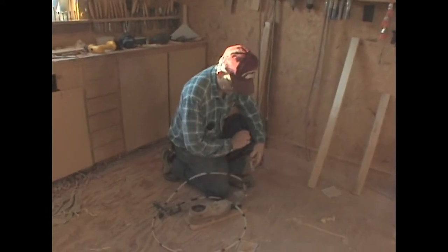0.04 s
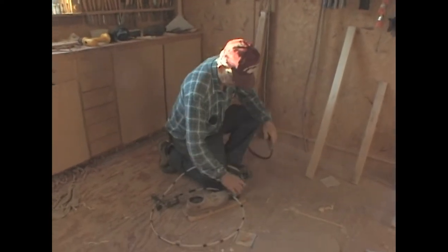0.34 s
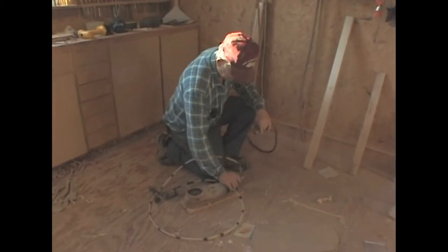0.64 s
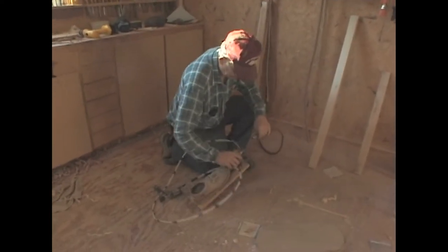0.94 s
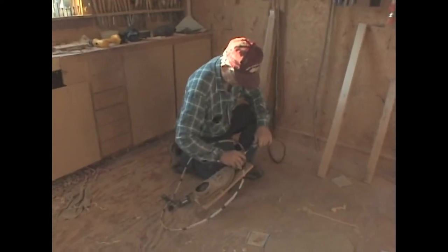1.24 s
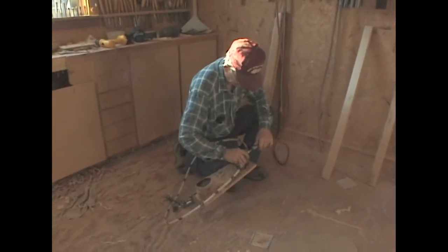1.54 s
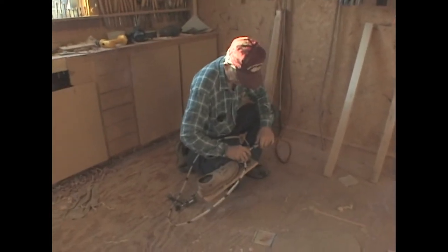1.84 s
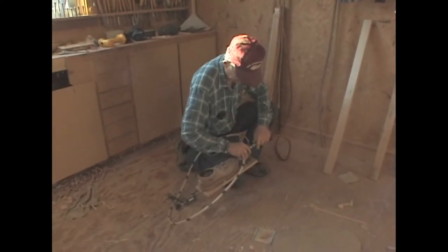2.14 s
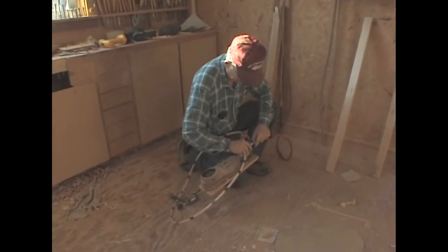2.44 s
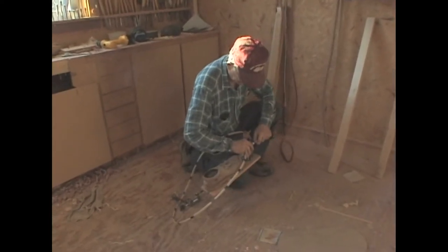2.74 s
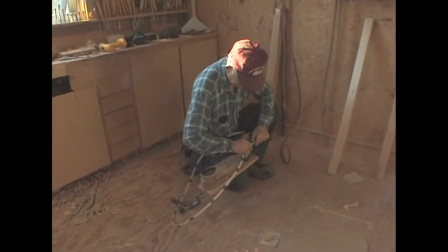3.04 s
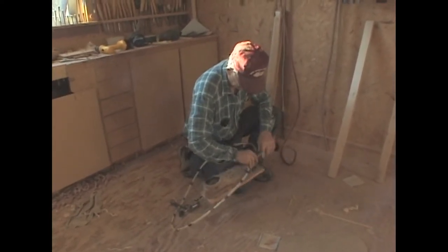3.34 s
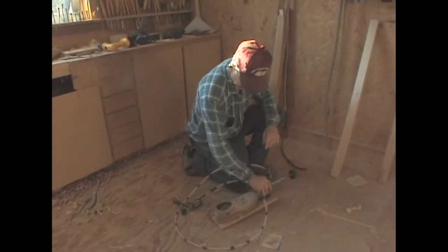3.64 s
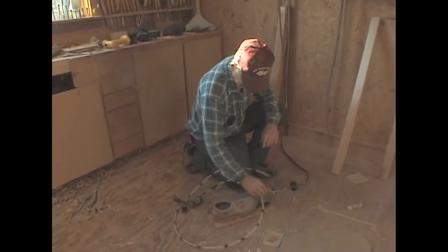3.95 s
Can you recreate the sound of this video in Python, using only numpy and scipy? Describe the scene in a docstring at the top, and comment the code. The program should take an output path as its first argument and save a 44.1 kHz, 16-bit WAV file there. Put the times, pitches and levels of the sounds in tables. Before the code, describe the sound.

An air hose is uncoupled from a tool in a quiet, slightly reverberant wooden workshop. A soft bump, faint rustling and taps fill the first second. The fitting clicks several times from 1.6 to 2.1 seconds, releases one short puff of air at 2.8 and snaps shut at 3.1. The hose end knocks on the floorboards at 3.7, and the tool lands at 3.9 with a dull thump and clink.

```python
"""In a wooden workshop, an air hose is uncoupled from a tool. After some handling on the floor the
fitting clicks as it is worked, lets out one short puff, a turbulent jet, and snaps shut. The hose end
drops on the boards and the tool is set down with a thump and a clink. Each impact is a burst of contact
noise, often with the damped modes of the struck body; the room reverberates after each sound."""
import sys
import numpy as np
from scipy import signal
from scipy.fft import rfft, irfft
from scipy.io import wavfile
from scipy.ndimage import uniform_filter1d

SR = 44100
rng = np.random.default_rng(int(sys.argv[2]) if len(sys.argv) > 2 else 0)


def to_wav(sig):
    """Store sig (one row per channel, or 1-D mono) as 16-bit WAV at the path in sys.argv[1].

    Samples outside -1..1 are clipped; the rate is SR.
    """
    pcm = np.clip(np.atleast_2d(sig), -1, 1) * 32767
    pcm = np.round(pcm).astype(np.int16)
    wavfile.write(sys.argv[1], SR, pcm.T)  # frames by channels


N = 176400

# spectrum of sliding friction: f/Hz, level/dB
SLIDE_SPECTRUM = [(150, -9), (800, 4), (2400, 3), (3500, -2), (4500, -5), (8000, -17.5)]


def amp(db):
    """Amplitude ratio of a level in decibels."""
    return 10 ** (np.asarray(db) / 20)


def unit(x):
    """Normalisation to an rms of 1."""
    return x / np.sqrt(np.mean(x ** 2) + 1e-20)


def unit_energy(x):
    """Normalisation to the energy of 10 ms at an rms of 1."""
    return x / np.sqrt(np.sum(x ** 2) / (SR * .01) + 1e-20)


def value_at(points, hz):
    """Interpolation of (f/Hz, value) points on a log-frequency axis."""
    f, value = np.transpose(points)
    return np.interp(np.log(hz + 1), np.log(f + 1), value)


def add(mix, start_s, sound):
    """Superposition of a sound on the mix."""
    part = mix[max(round(start_s * SR), 0):][:len(sound)]
    part += sound[:len(part)]


def colour(x, spectrum):
    """Minimum-phase filtering by a curve of (f/Hz, level/dB) points."""
    log_gain = np.log(amp(value_at(spectrum, abs(np.fft.fftfreq(4096, 1 / SR)))))
    response = np.fft.ifft(np.exp(np.conj(signal.hilbert(log_gain)))).real
    return signal.oaconvolve(x, response[:len(response) // 2])[:len(x)]


def brighten(x, lift_db, from_hz=4000, to_hz=13000):
    """A shelving filter lifts or dulls the treble."""
    return colour(x, [(from_hz, 0), (to_hz, lift_db)])


def uneven(x, deviation_db=3.2):
    """Modal coupling: each point of contact favours some treble resonances and misses others."""
    hz = np.geomspace(900, 16000, 48)
    db = np.append(0, deviation_db * rng.standard_normal(len(hz) - 1))
    return colour(x, np.transpose([hz, db]))


def contact(t, fade_s, rise_s):
    """Chatter of two surfaces is broadband noise: it rises, holds as long again, and fades."""
    envelope = np.minimum(t / rise_s, 1) * np.exp(-np.maximum(t - 2 * rise_s, 0) / fade_s)
    chatter = rng.standard_normal(len(t)) * envelope
    for _ in range(3):  # flatten the spectrum, then restore the outline in time
        chatter = irfft(np.exp(1j * np.angle(rfft(chatter))), len(t)) * np.sqrt(envelope)
    return chatter


def mode(t, hz, t60, spread):
    """Seven close partials beat as they decay; the grip detunes them from blow to blow."""
    detune, phase = rng.uniform(-1.134, 1, (2, 7, 1))
    partials = np.sin(2 * np.pi * (hz * (1 + spread * detune) * t + phase))
    return 1000 ** (-t / t60) * partials.sum(0)


def impacts(blows, spectrum, modes=(), rise_s=.001, spread=.017):
    """Impact excitation: contact noise plus any damped modes; hardness favours the upper ones."""
    out, t = np.zeros(N), np.arange(SR // 4) / SR
    swell = 1 - np.exp(-t / rise_s)
    for start, db, fade_s, lift_db, *hardness_db in blows:
        crack = unit_energy(uneven(colour(contact(t, fade_s, rise_s), spectrum)))
        ringing = sum(amp(mode_db) * unit_energy(swell * mode(t, hz, t60, spread))
                      for hz, mode_db, t60 in modes)
        blow = crack + ringing
        if hardness_db:
            blow = brighten(blow, hardness_db[0], from_hz=1200, to_hz=4200)
        add(out, start, amp(db) * unit_energy(brighten(blow, lift_db)))
    return out


def friction(spectrum, grain_db=3):
    """Rubbing surfaces give noise, amplitude-modulated in clumps of about 3 ms."""
    clumps = unit(uniform_filter1d(rng.standard_normal(N), 130))
    return unit(colour(rng.standard_normal(N) * amp(grain_db * clumps), spectrum))


def room_tone(level_db=-64.5):
    """Stationary background noise, strongest in the bass."""
    spectrum = [(25, -8.5), (300, 5), (700, -7), (2000, -13), (15000, -19)]  # f/Hz, level/dB
    return amp(level_db) * unit(colour(rng.standard_normal(N), spectrum))


def clothes_rustle():
    """Friction of cloth gives a faint noise that swells and sinks."""
    envelope = [(.2, -54), (.35, -64), (1, -62), (1.5, -76), (2.7, -76), (3.4, -62.5)]  # t/s, level/dB
    spectrum = [(60, -8.5), (400, 1.5), (2000, -12.5), (14000, -20.5)]  # f/Hz, level/dB
    return friction(spectrum) * amp(np.interp(np.arange(N) / SR, *np.transpose(envelope)))


def floor_bumps():
    """Soft impacts on the floor put little energy into the treble."""
    blows = [(.1085, -30.5, 0.008, -5), (3.908, -18.5, 0.003, -29)]  # t/s, level/dB, contact fade/s, treble lift/dB
    spectrum = [(50, -27), (200, -4), (550, 0.5), (1100, -14), (14000, -65)]  # contact: f/Hz, level/dB
    return impacts(blows, spectrum, rise_s=.002045)


def slides():
    """Sliding friction of hose and tool, in short strokes."""
    strokes = [(0.113, .13, -52, 6.5), (3.843, 0.071, -47.5, -3)]  # t/s, duration/s, level/dB, treble lift/dB
    out, t = np.zeros(N), np.arange(N) / SR
    grit = friction(SLIDE_SPECTRUM)
    for start, length, db, lift_db in strokes:
        arch = abs(np.sin(np.pi * np.clip((t - start) / length, 0, 1))) ** .5
        out += amp(db) * arch * unit(uneven(brighten(grit, lift_db)))
    return out


def handling_taps():
    """Light taps and scuffs radiate contact noise without ringing."""
    blows = [(.448, -54, 0.003, -20), (.511, -55, 0.0014, 6), (.651, -51.5, 0.0025, 3),
             (1.3495, -56, 0.0052, -5), (3.686, -48.5, 0.039, -27)]  # t/s, level/dB, contact fade/s, treble lift/dB
    spectrum = [(90, -4), (300, 5.5), (2100, -0.5), (15000, -30)]  # contact: f/Hz, level/dB
    return impacts(blows, spectrum)


def board_knocks():
    """Hard impacts set the floor boards into damped free vibration."""
    blows = [(.718, -39, .007, -4), (3.725, -15.5, 0.0073, 2)]  # t/s, level/dB, contact fade/s, treble lift/dB
    spectrum = [(60, -15.5), (500, 1), (1200, -2), (1600, -8), (2000, -3), (2550, -9), (3200, -18.5),
                (11500, -30.5), (15000, -45)]  # contact: f/Hz, level/dB
    modes = [(207.6, -16, 0.15), (540, -9, 0.07), (911, -7, 0.05), (1281, -9, 0.05), (1808, -17, 0.19)]  # f/Hz, level/dB, T60/s
    return impacts(blows, spectrum, modes, rise_s=.00083, spread=.01)


def fitting_scrape(start_s=.84, length_s=.115, final_slips_per_s=3000, level_db=-54):
    """Stick-slip friction: the fitting drags over the boards in slips that come ever faster."""
    t = np.arange(round(length_s * SR)) / SR
    slip_chance = final_slips_per_s / SR * t / length_s
    slips = rng.standard_normal(len(t)) * (rng.random(len(t)) < slip_chance)
    out = np.zeros(N)
    add(out, start_s, amp(level_db) * unit(uneven(colour(slips, SLIDE_SPECTRUM))))
    return out


def fitting_clicks(fade_s=.002):
    """Small impacts in the worked fitting excite its heavily damped modes."""
    clicks = [(.9695, -48.5, -8, -3), (1.6408, -30.5, -7, 1), (1.8438, -32.5, -1, -8),
              (1.9302, -34.5, 6, 1), (1.9375, -38, -10, -3), (1.982, -40, -8, -3), (1.996, -33.5, -2, -5),
              (2.005, -32, 15, -1), (2.0102, -29, 6, 1), (2.1058, -34, 7, -2), (2.1212, -37.5, 7, -2),
              (2.6285, -44.5, 12, -7), (2.6365, -45, 11, -7)]  # t/s, level/dB, treble lift/dB, hardness/dB
    spectrum = [(100, -20.5), (450, 1), (2600, -1.5), (4400, -2), (5600, -17.5), (7200, -20.5),
                (9300, -16.5), (12700, -22.5), (15000, -35)]  # contact: f/Hz, level/dB
    modes = [(998, -10, 0.03), (2021, -4, 0.022), (4200, -14, 0.022)]  # f/Hz, level/dB, T60/s
    blows = [(s, db, fade_s, lift_db, hardness_db) for s, db, lift_db, hardness_db in clicks]
    return impacts(blows, spectrum, modes, rise_s=.00198, spread=.032)


def air_puff(leak_s=2.824, open_s=2.833, rise_s=.018, level_db=-18.5, fall_db_per_s=333):
    """Jet noise: air leaks past the seal, bursts from the opening valve and dies as the hose empties."""
    spectrum = [(50, -10.5), (330, 7.5), (1800, -2), (2800, 2), (3700, -2), (7200, 3.5), (8500, -7),
                (12000, 5), (13500, -2.5)]  # jet: f/Hz, level/dB
    t = np.arange(N) / SR
    leak = amp(-28) * (t > leak_s)
    opening = np.clip((t - open_s) / rise_s, 0, 1) ** 2.35
    pressure = amp(-fall_db_per_s * np.maximum(t - open_s - rise_s, 0))
    jet = unit(colour(rng.standard_normal(N), spectrum))
    return amp(level_db) * jet * pressure * (opening + leak)


def sleeve_snaps():
    """The locking sleeve snaps shut: abrupt contacts excite a high resonance."""
    blows = [(3.1105, -38, 0.00058, -2.5), (3.1325, -28, 0.0043, -2.5)]  # t/s, level/dB, contact fade/s, treble lift/dB
    spectrum = [(60, -12), (250, 0), (3200, -2), (5300, 4), (6700, -5), (15500, -12)]  # contact: f/Hz, level/dB
    modes = [(4600, -13.5, 0.22)]  # f/Hz, level/dB, T60/s
    return impacts(blows, spectrum, modes, rise_s=.0007, spread=.14)


def tool_touchdown():
    """Low resonances make the tool's first contacts sound hollow."""
    blows = [(3.504, -46, .003, -5), (3.5335, -25, 0.0011, -5)]  # t/s, level/dB, contact fade/s, treble lift/dB
    spectrum = [(60, -39), (340, 2.5), (700, -25), (6000, -67)]  # contact: f/Hz, level/dB
    modes = [(325, 3, .075), (260, -7, .15)]  # f/Hz, level/dB, T60/s
    return impacts(blows, spectrum, modes, rise_s=.0028)


def ring_tinkle():
    """A small loose ring vibrates at a high natural frequency."""
    blows = [(3.547, -49.5, 0.0016, -8)]  # t/s, level/dB, contact fade/s, treble lift/dB
    spectrum = [(5000, -15), (7000, 5), (10000, -12)]  # contact: f/Hz, level/dB
    modes = [(7020, -5, 0.12)]  # f/Hz, level/dB, T60/s
    return impacts(blows, spectrum, modes)


def tool_thump():
    """The tool lands with a dull, low thump whose damped modes ring briefly."""
    blows = [(3.9035, -11, .0045, 0), (3.9155, -13, .0042, 0)]  # t/s, level/dB, contact fade/s, treble lift/dB
    spectrum = [(45, -33), (115, 0), (380, -1), (900, -24), (14000, -59.5)]  # contact: f/Hz, level/dB
    modes = [(173, -4, .13), (243.4, -6, .13), (303.4, -8, .13), (354.4, -5, .13)]  # f/Hz, level/dB, T60/s
    return impacts(blows, spectrum, modes, rise_s=.004, spread=.0065)


def metal_clink():
    """A metal part rings in free vibration on landing."""
    blows = [(3.926, -26.5, 0.0036, 2.5)]  # t/s, level/dB, contact fade/s, treble lift/dB
    spectrum = [(500, -36), (2300, -10), (2850, 7.5), (4500, -6.5), (14000, -24)]  # contact: f/Hz, level/dB
    modes = [(2870, -10, .06), (3260, -11, 0.15)]  # f/Hz, level/dB, T60/s
    return impacts(blows, spectrum, modes, spread=.04)


def reverberation(x, build_s=.0043):
    """Dense reflections from wooden walls decay exponentially, the treble first."""
    bands = [(100, 0.45, 13), (308, 0.66, 1), (1490, 0.52, 0), (4500, 0.47, -2), (13100, 0.31, -2.5)]  # diffuse field: f/Hz, T60/s, level/dB
    hz, t, noise = signal.stft(rng.standard_normal(SR), SR, nperseg=256)
    t60, db = (value_at([(row[0], row[k]) for row in bands], hz)[:, None] for k in (1, 2))
    decay_rate = np.log(1000) / t60
    decay = np.sqrt(2 * decay_rate / SR) * np.exp(-decay_rate * t)  # unit energy in each band
    tail = signal.istft(noise * amp(db) * decay, SR, nperseg=256)[1]
    tail *= np.minimum(np.arange(len(tail)) / SR / build_s, 1) ** 2
    return signal.fftconvolve(x, tail)[:N]


def scene():
    """Direct and reverberant sound add; sources on the floor excite the room more than those in hand."""
    hands = fitting_clicks() + sleeve_snaps() + handling_taps() + metal_clink()
    hands += slides() + clothes_rustle() + fitting_scrape()
    boards = board_knocks() + floor_bumps() + ring_tinkle()
    weight = tool_thump() + tool_touchdown()
    air = air_puff()
    echo = reverberation(amp(-9.5) * hands + amp(-5.5) * boards + amp(-8.5) * weight + amp(-12) * air)
    return (hands + boards + weight + air + echo + room_tone())[None]


def record(dry, low_cut_hz=68, edge_hz=16000):
    """Band limiting: the microphone thins the deep bass and a low-pass removes the top treble."""
    thinned = signal.lfilter(*signal.butter(1, low_cut_hz, "highpass", fs=SR), dry)
    low_pass = signal.firwin(511, edge_hz, window=("kaiser", 9), fs=SR)
    return signal.oaconvolve(thinned, low_pass[None], "same")


dry = scene()
out = record(dry)
to_wav(out)
```